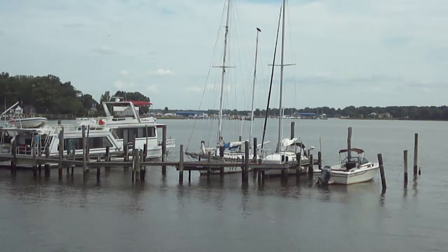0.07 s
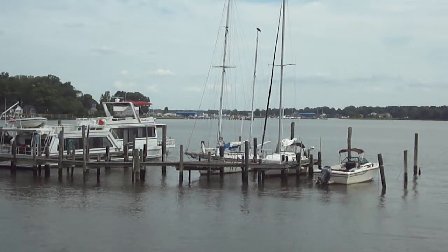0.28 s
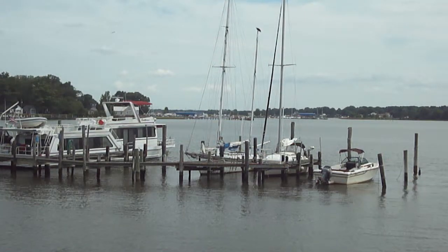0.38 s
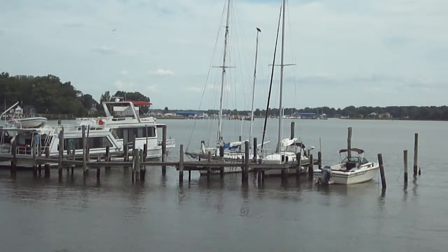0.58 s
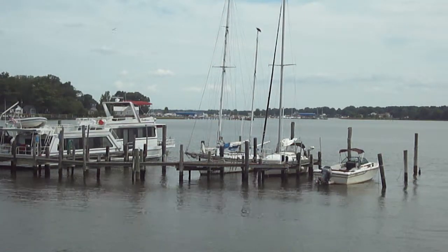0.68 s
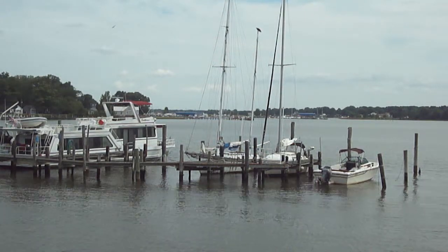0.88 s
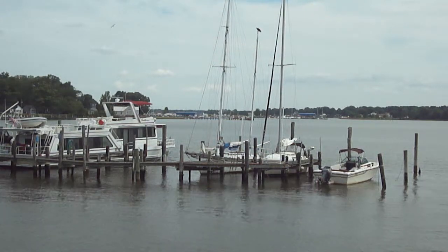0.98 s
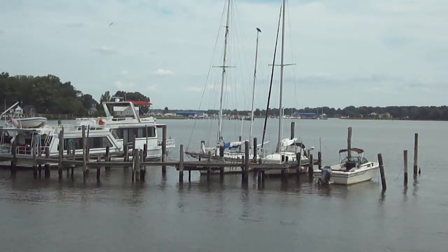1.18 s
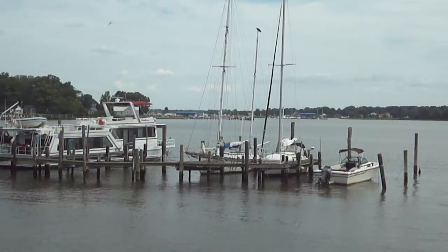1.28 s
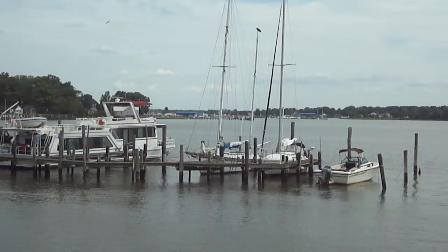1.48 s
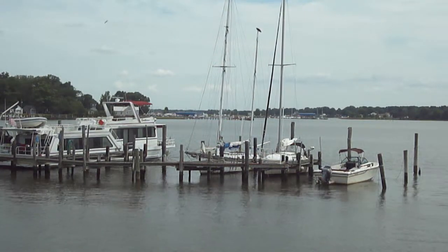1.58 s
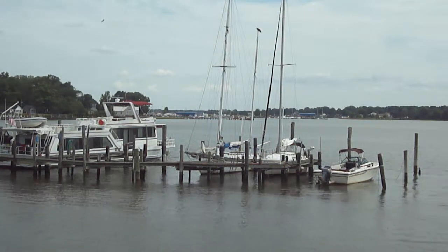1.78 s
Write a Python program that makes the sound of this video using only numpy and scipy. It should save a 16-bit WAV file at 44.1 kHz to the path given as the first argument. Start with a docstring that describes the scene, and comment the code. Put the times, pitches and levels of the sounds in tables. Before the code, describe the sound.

Small wave hits a dock, slapping and knocking wood, then bubbling away between posts. One soft falling bird chirp before, one louder after, with a dry insect buzz in two phrases over quiet shore hiss, outdoors, mono.

```python
"""Water laps at a calm marina: noise-burst slaps, a hard knock on wood, ringing plops, and a wash of
bubble and droplet grains. A bird gives two falling sine chirps that beat against a near reflection
and echo over the water. An insect rattles in two quickening phrases of pulsed, coloured noise.
Behind them lie faint wavering whistles, a low hum, and the quiet noise hiss of the shore."""
import sys
import numpy as np
from scipy import signal
from scipy.fft import rfft, irfft
from scipy.io import wavfile
from scipy.ndimage import uniform_filter1d

SR = 44100
rng = np.random.default_rng(int(sys.argv[2]) if len(sys.argv) > 2 else 0)


def waveform_to_disk(signal):
    """Save audio, clipped to [-1, 1], as 16-bit WAV at the path in sys.argv[1]."""
    frames = np.transpose(np.atleast_2d(signal))
    scaled = np.clip(frames, -1, 1) * 32767
    samples = np.round(scaled).astype(np.int16)
    wavfile.write(sys.argv[1], SR, samples)


N = 81585
T = np.arange(N) / SR
MIRROR_S = .00482  # delay of the near reflection


def undb(db):
    """Decibels to gain."""
    return 10 ** (np.asarray(db) / 20)


def unit(x):
    """Scale to rms 1."""
    return x / np.sqrt(np.mean(x ** 2) + 1e-20)


def curve(rows, axis=1):
    """Automate one column of a table, joined by straight lines in time."""
    rows = np.array(rows)
    return np.interp(T, rows[:, 0], rows[:, axis])


def colour(x, points):
    """EQ a sound with a curve of (f/Hz, level/dB) points, then set it to rms 1."""
    hz, db = np.array(points).T
    f = np.maximum(np.fft.rfftfreq(N, 1 / SR), 1)
    gain = undb(np.interp(np.log(f), np.log(hz), db))
    return unit(irfft(rfft(x) * gain, N))


def noise():
    """White noise."""
    return rng.standard_normal(N)


def walk(rate):
    """Smooth random drift of rms 1; a higher rate moves faster."""
    k = max(int(SR / rate), 1)
    return unit(uniform_filter1d(uniform_filter1d(noise(), k), k))


def burst(start, attack, decay):
    """Envelope with a straight rise and an exponential fall."""
    age = np.maximum(T - start, 0)
    return np.minimum(age / attack, 1) * np.exp(-np.maximum(age - attack, 0) / decay)


def late(x, seconds):
    """Delay a sound."""
    return np.interp(T - seconds, T, x, left=0)


AIR_T60_S = 0.96


def air(x):
    """Diffuse echo from hulls and shore: convolution with a decaying noise tail."""
    tail = noise() * burst(0.0048, .015, AIR_T60_S / np.log(1000))
    return signal.fftconvolve(x, tail / np.linalg.norm(tail))[:N]


def grains(per_s, low_hz, high_hz, cycles, spread_db, share):
    """A cloud of short rising rings, blended with a smooth rush; share is the rings' part of the power."""
    rings = np.zeros(N)
    for when, pitch, size in rng.random((int(per_s * N / SR), 3)):
        hz = low_hz + (high_hz - low_hz) * pitch
        i = int(when * N)
        length = min(int(5 * cycles * SR / hz), N - i)
        age = np.arange(length) * hz / SR  # in cycles
        ring = np.exp(-age / cycles) * np.sin(2 * np.pi * age * (1 + 0.019 * age / cycles))
        level = np.sqrt(hz) * undb(-spread_db * np.log(max(size, .01)))
        rings[i:i + length] += ring * level
    return np.sqrt(share) * unit(rings) + np.sqrt(1 - share) * noise()


# Water slapping wood: t/s, level/dB, centre f/Hz, width/Hz, decay/s
SLAPS = [(.383, -34, 1490, 2500, .004), (0.412, -29.5, 5360, 3450, .003),
         (0.416, -27.5, 3640, 3000, 0.0017), (0.423, -29.5, 1110, 1490, 0.008),
         (0.48, -33.5, 4480, 3980, 0.0086), (.4922, -28.5, 2690, 700, 0.0067),
         (0.495, -36, 430, 300, 0.0068), (0.4989, -29, 2960, 4020, 0.0033),
         (.558, -29.5, 2850, 1300, 0.004), (0.567, -27, 1230, 596, 0.004), (0.592, -34.5, 920, 1210, 0.03)]
SLAP_ATTACK_S, SPRAY_DB = 0.00033, -10  # spray is relative to the splash
# Air pockets ringing: t/s, level/dB (peak), f/Hz, decay/s
PLOPS = [(.517, -27.5, 1155, 0.0074), (.561, -22.5, 710, 0.0065), (.599, -30.5, 616, 0.022),
         (.636, -37, 448, 0.0093), (.658, -36.5, 603, 0.0076), (.880, -29, 800, 0.005),
         (.926, -26, 610, 0.0086), (1.066, -29, 1177, 0.0062), (1.628, -49, 215, 0.017),
         (1.750, -44, 288, 0.011)]
PLOP_ATTACK_S = .003
PLOP_BEND = 1.41  # half the fractional pitch rise per second
LAPS_LOW_CUT_HZ, WATER_AIR_DB = 270, -5.5


def laps():
    """Slaps are band-passed noise with a little spray; plops are damped air pockets rising in pitch."""
    out = np.zeros(N)
    for start, db, hz, width, decay in SLAPS:
        b, a = signal.iirpeak(hz, hz / width, fs=SR)
        splash = unit(signal.lfilter(b, a, signal.lfilter(b, a, noise())))
        spray = undb(SPRAY_DB) * noise()
        out += undb(db) * (splash + spray) * burst(start, SLAP_ATTACK_S, decay)
    for start, db, hz, decay in PLOPS:
        age = np.maximum(T - start, 0)
        ring = np.sin(2 * np.pi * hz * age * (1 + PLOP_BEND * age))
        out += undb(db) * burst(start, PLOP_ATTACK_S, decay) * ring
    out = signal.sosfilt(signal.butter(2, LAPS_LOW_CUT_HZ, "high", fs=SR, output="sos"), out)
    return out + undb(WATER_AIR_DB) * air(out)


KNOCK_S, KNOCK_DB, KNOCK_MIRROR = .4225, -19, 0.36  # time, level, reflection gain
KNOCK_LOW_CUT_HZ = 440
# Modes of the struck wet wood: f/Hz, level/dB (relative), decay/s
KNOCK_MODES = [(590, -14.5, 0.003), (870, -1.5, 0.0011), (1250, -2.5, 0.0014)]


def knock():
    """A crest hits a piling squarely: quickly damped modes of wet wood, and their near reflection."""
    blow = np.zeros(N)
    for hz, db, decay in KNOCK_MODES:
        mode = np.sin(2 * np.pi * hz * (T - KNOCK_S))
        blow += undb(db) * burst(KNOCK_S, 0.00024, decay) * mode
    low_cut = signal.butter(4, KNOCK_LOW_CUT_HZ, "high", fs=SR, output="sos")
    blow = undb(KNOCK_DB) * signal.sosfilt(low_cut, blow)
    return blow + KNOCK_MIRROR * late(blow, MIRROR_S)


# The passing wave: t/s, gurgle level/dB, fizz level/dB
WASH = [(0, -56, -88), (.36, -56, -51), (.44, -44, -39), (.54, -40.5, -47), (.61, -39, -39),
        (.68, -39, -37), (.78, -36.5, -33.5), (.93, -31.5, -33.5), (1.06, -36, -35.5), (1.16, -41.5, -36),
        (1.24, -48, -42.5), (1.38, -50.5, -38.5), (1.56, -47, -45.5), (1.72, -49, -46.5),
        (1.85, -50.5, -53)]
# Spectrum of the bubbles: f/Hz, level/dB (relative)
GURGLE = [(60, -61), (150, -19), (300, -9.5), (580, -2.5), (800, -2), (1250, -1), (1700, -7.5), (2500, -5),
          (5000, -41), (11000, -36)]
# Spectrum of the droplets: f/Hz, level/dB (relative)
FIZZ = [(300, -48), (1000, -0.5), (2100, -1.5), (3000, -1), (4500, -4.5), (5500, -5.5), (6500, -16.5),
        (8500, -14), (11000, -22)]


def wash():
    """The wave runs through the pilings: bubbles gurgle, droplets fizz."""
    bubbles = grains(per_s=1400, low_hz=279, high_hz=2124, cycles=3, spread_db=2.5, share=0.35)
    droplets = grains(per_s=2500, low_hz=1600, high_hz=10900, cycles=0.97, spread_db=3, share=0.39)
    gurgle = colour(bubbles, GURGLE) * undb(curve(WASH))
    fizz = colour(droplets, FIZZ) * undb(curve(WASH, axis=2))
    return gurgle + fizz


# One curve per chirp: t/s, f/Hz, level/dB (rms of the lower tone)
CHIRPS = [
    [(.190, 2593, -49), (.202, 2480, -28), (.220, 2405, -26), (.239, 2287, -26), (.254, 2190, -28),
     (.272, 2104, -35), (.295, 1900, -44)],
    [(1.074, 4100, -50), (1.090, 3368, -29.5), (1.110, 2920, -22), (1.128, 2700, -21.5), (1.147, 2500, -17),
     (1.160, 2386, -21), (1.174, 2320, -22), (1.186, 2225, -31.5), (1.203, 2056, -34)],
]
WAVER = 0.0028  # rms pitch drift, as a fraction
OCTAVE_DB = -11.5  # relative to the lower tone, at full effort
OCTAVE_FULL_DB, OCTAVE_GROWTH = -19.5, 0.66  # full-effort level; octave dB lost per dB below it
MIRROR_GAIN = 0.7
ECHO_S, ECHO_DB, BIRD_AIR_DB = 0.17, -32, -11.5


def bird():
    """Falling whistles whose octave grows with effort; a near reflection makes the lower tone throb."""
    tone, octave = np.zeros(N), np.zeros(N)
    for rows in CHIRPS:
        pitch = curve(rows) * (1 + WAVER * walk(400))
        phase = 2 * np.pi * np.cumsum(pitch) / SR
        db = curve(rows, axis=2)
        edges = np.clip(np.minimum(T - rows[0][0], rows[-1][0] - T) / 0.0044, 0, 1)
        swell = edges * undb(db) * np.sqrt(2)
        octave_db = OCTAVE_DB + OCTAVE_GROWTH * np.minimum(db - OCTAVE_FULL_DB, 0)
        tone += swell * np.sin(phase)
        octave += swell * undb(octave_db) * np.sin(2 * phase)
    call = tone + octave
    reflection = MIRROR_GAIN * late(tone, MIRROR_S)
    echo = undb(ECHO_DB) * late(call, ECHO_S)
    return call + reflection + echo + undb(BIRD_AIR_DB) * air(call)


# Insect phrases: first pulse t/s, end t/s, first period/s, shortening per pulse/s
PHRASES = [(.0155, .53, .0204, .00014), (1.2115, 1.66, .0223, .000346)]
# Loudness ride for pulses and bed together: t/s, level/dB
INSECT_LEVEL = [(0, -48), (.12, -43.5), (.24, -39), (.36, -43), (.5, -43), (.62, -47.5), (1.1, -47),
                (1.25, -45), (1.38, -41), (1.55, -41), (1.655, -42.5), (1.68, -46), (1.85, -56)]
# Spectrum of the rasp: f/Hz, level/dB (relative)
RASP = [(2000, -30), (3400, -19), (3850, -0.5), (4400, 2), (4850, -2.5), (5300, -2), (5850, -4),
        (6250, -13), (6900, -11), (7500, -19.5), (8300, -19.5), (9300, -29.5), (11000, -36)]
RASP_ATTACK_S, RASP_DECAY_S, RASP_SCATTER_DB = .0016, 0.0023, 0.3
RASP_PULSE_DB, RASP_BED_DB = 10.5, -0.5  # relative to the loudness ride
RASP_MIRROR = 0.36  # reflection gain


def insect():
    """Short, even rasps quicken through each phrase and ring the insect's body, over their own blur."""
    pulses = np.zeros(N)
    for start, end, period, shortening in PHRASES:
        for size in rng.standard_normal(40):
            if start < end:
                pulses += undb(RASP_SCATTER_DB * size) * burst(start, RASP_ATTACK_S, RASP_DECAY_S)
            start, period = start + period, period - shortening
    # Flatten the noise's own level swings so the pulses stay even
    buzz = signal.hilbert(colour(noise(), RASP))
    buzz = unit(buzz.real / np.sqrt(uniform_filter1d(np.abs(buzz) ** 2, size=60)))
    bed = undb(RASP_BED_DB) * colour(noise(), RASP)
    rasp = undb(RASP_PULSE_DB) * pulses * buzz + bed
    return (rasp + RASP_MIRROR * late(rasp, MIRROR_S)) * undb(curve(INSECT_LEVEL))


# Thin far whistles: t/s, length/s, f/Hz, glide/(Hz per s), level/dB (peak)
WHISTLES = [(0.464, 0.25, 1838, -100, -45), (1.35, 0.21, 1810, -2, -44.5), (1.587, .045, 2750, -6000, -46),
            (1.812, 0.037, 5020, 0, -43.5)]
WHISTLE_WAVER = 0.0043  # rms pitch drift, as a fraction


def whistles():
    """Faint far-off sine tones, swelling and fading as their pitch wavers."""
    out = np.zeros(N)
    for start, length, hz, glide, db in WHISTLES:
        age = np.clip(T - start, 0, length)
        swell = np.sqrt(np.abs(np.sin(np.pi * age / length)))
        pitch = (hz + glide * age) * (1 + WHISTLE_WAVER * walk(160))
        out += undb(db) * swell * np.sin(2 * np.pi * np.cumsum(pitch) / SR)
    return out


HUM_HZ, HUM_DB, HUM_START_S, HUM_END_S = 372, -57.5, 1.315, 1.75


def hum():
    """A faint far sine tone that fades in, wavers in pitch and fades out."""
    swell = np.clip(np.minimum(T - HUM_START_S, HUM_END_S - T) / 0.037, 0, 1)
    pitch = HUM_HZ * (1 + 0.014 * walk(29))
    return undb(HUM_DB) * swell * np.sin(2 * np.pi * np.cumsum(pitch) / SR)


# Spectrum of the shore: f/Hz, level/dB (relative)
SHORE = [(25, -33), (55, -18), (100, -15), (200, -4.5), (400, -1), (700, 1.5), (1150, 0.5), (1700, -4),
         (3000, -2.5), (5000, -6), (7000, -6), (11000, -21)]
SHORE_DB = -46


def shore():
    """Hiss of far water and trees: coloured noise whose level drifts slightly."""
    return colour(noise(), SHORE) * undb(SHORE_DB + 0.48 * walk(3.4))


def scene():
    """Everything at one microphone."""
    water = laps() + knock() + wash()
    animals = bird() + insect()
    background = whistles() + hum() + shore()
    return (water + animals + background)[None]


TOP_HZ = 10950


def record(dry):
    """The recorder cuts the top with a steep low-pass."""
    return signal.sosfilt(signal.ellip(10, .2, 80, TOP_HZ, fs=SR, output="sos"), dry)


dry = scene()
out = record(dry)
waveform_to_disk(out)
```